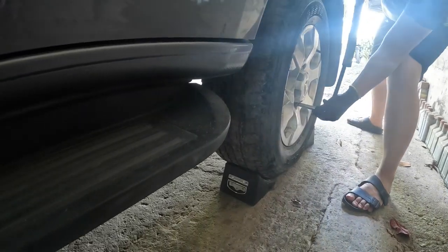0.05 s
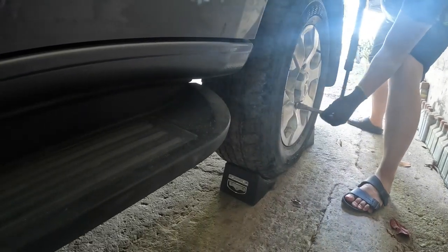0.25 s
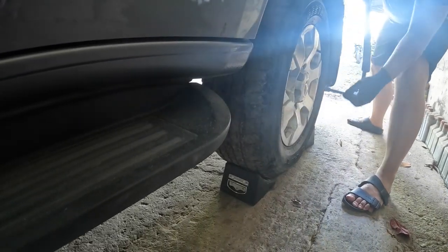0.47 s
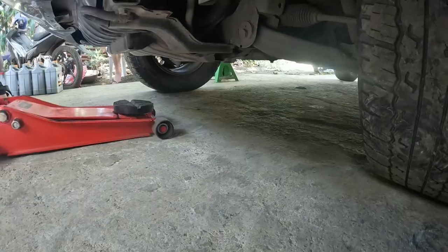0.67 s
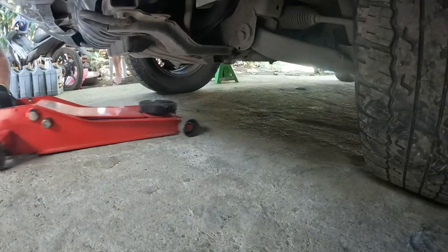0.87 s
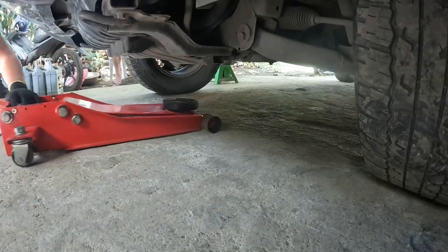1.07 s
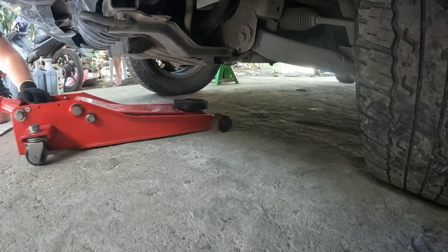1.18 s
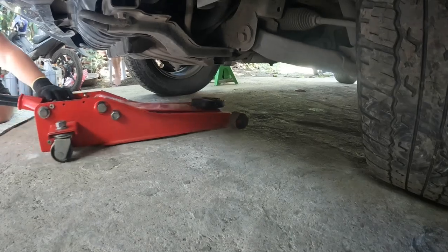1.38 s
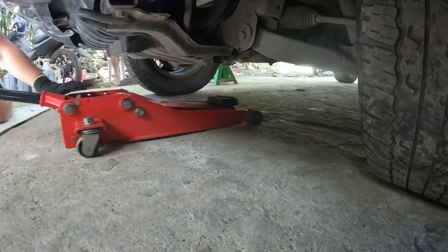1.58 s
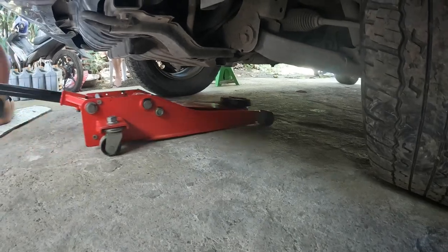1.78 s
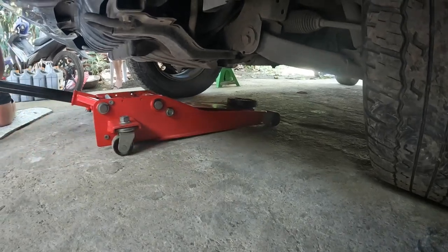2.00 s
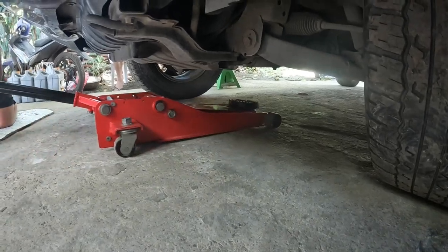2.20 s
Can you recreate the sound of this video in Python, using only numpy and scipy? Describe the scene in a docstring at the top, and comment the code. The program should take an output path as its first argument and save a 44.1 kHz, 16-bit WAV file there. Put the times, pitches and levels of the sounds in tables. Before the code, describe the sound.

A steel floor jack rolls over rough concrete under a car, rumbling and clattering close by while a dry wheel squeals. Just before it, a wrench squeaks and clacks on a tight nut in soft outdoor air.

```python
"""First a wrench squeaks, scrapes and clacks on a tight wheel nut, over soft outdoor air.
After about half a second the scene changes abruptly: a steel floor jack is pushed over rough concrete
under a car. Its wheels grind and rumble, the loose lifting arm and casters knock at every bump,
and a dry wheel squeals as it sticks and slips. A little after two seconds the jack comes to rest."""
import sys
import numpy as np
from scipy import signal
from scipy.fft import rfft, irfft
from scipy.io import wavfile
from scipy.ndimage import uniform_filter1d

SR = 44100
rng = np.random.default_rng(int(sys.argv[2]) if len(sys.argv) > 2 else 0)


def waveform_to_disk(signal):
    """Save audio, clipped to [-1, 1], as 16-bit WAV at the path in sys.argv[1]."""
    frames = np.transpose(np.atleast_2d(signal))
    scaled = np.clip(frames, -1, 1) * 32767
    samples = np.round(scaled).astype(np.int16)
    wavfile.write(sys.argv[1], SR, samples)


N = 99225
T = np.arange(N) / SR

# The notes at which the jack's frame rings. Each row: pitch in Hz, width in Hz, level in dB.
FRAME_MODES = [(400, 5.3, -13), (510, 15, -0.5), (774.5, 46, 0), (1160, 30, 2.5), (1409, 33, 9),
               (1530, 11, -14), (1704, 210, 2), (1940, 28, -7), (2280, 45, -7), (2770, 17, -4),
               (3064, 96, -9), (3580, 40, -7), (4440, 150, -11.5), (5160, 91, -21), (6480, 60, -13),
               (8200, 59, -26), (10370, 45, -18), (10900, 80, -26)]


def from_db(db):
    """Turn decibels into a gain."""
    return 10 ** (np.asarray(db) / 20)


def rms_one(x):
    """Scale a sound to an average level of 1."""
    return x / np.sqrt(np.mean(x ** 2) + 1e-20)


def in_time(rows):
    """Join rows that start with a time by straight lines: one curve for each other column."""
    times, *columns = np.transpose(rows)
    return [np.interp(T, times, column) for column in columns]


def drift(hz):
    """A random wobble of size 1; more Hz makes it quicker."""
    r = np.exp(-2 * np.pi * hz / SR)
    return rms_one(signal.lfilter([1], [1, -2 * r, r * r], rng.standard_normal(2 * N))[N:])


def body(x, colour, modes=()):
    """Give a sound a colour (its balance of low and high) and ringing notes, at level 1."""
    f = np.maximum(np.arange(N // 2 + 1) * SR / N, 1)
    hz, db = np.transpose(colour)
    power = from_db(np.interp(np.log(f), np.log(hz), db)) ** 2
    for centre, width, level in modes:
        power += from_db(level) ** 2 / (1 + ((f - centre) / width) ** 2) ** 2
    return rms_one(irfft(rfft(x) * np.sqrt(power), N))


def noise():
    """A plain, even hiss."""
    return rng.standard_normal(N)


def grains(per_s, spread_db):
    """Tiny random contacts of uneven size."""
    sizes = from_db(spread_db * np.minimum(rng.exponential(1, N), 3))
    return (rng.random(N) < per_s / SR) * sizes * rng.choice([-1, 1], N)


def even(x, span_s):
    """Hold a sound's level steady from moment to moment."""
    power = np.abs(uniform_filter1d(x * x, max(int(span_s * SR), 2)))
    return x / np.sqrt(power + 1e-9)


def split(x, treble_hz=3520):
    """Split a sound into its low and high parts."""
    low = signal.sosfiltfilt(signal.butter(2, treble_hz, fs=SR, output="sos"), x)
    return low, x - low


def blows(times, levels_db, rise_s, t60):
    """The loudness curve of hits that rise fast, then fade by 60 dB in t60 seconds."""
    power = np.zeros(N)
    for s, db in zip(times, levels_db):
        start = int(s * SR)
        age = T[:max(N - start, 0)][:SR // 2]
        fade = from_db(db - 60 * np.maximum(age - rise_s, 0) / t60)
        power[start:start + len(age)] += (np.minimum(age / rise_s, 1) * fade) ** 2
    return np.sqrt(power)


def stick_slip(hz, harmonics_db, bright_db, flutter_db, rough):
    """A rubbing tone: uneven slips blur the higher harmonics, and each harmonic flutters."""
    phase = 2 * np.pi * np.cumsum(hz) / SR + rough * drift(173)
    tone = np.zeros(N)
    for k, db in enumerate(harmonics_db):
        flutter = flutter_db * np.sqrt(k + 1) * drift(61)
        tone += from_db(db + bright_db * min(k, 2) + flutter) * np.sin((k + 1) * phase)
    return tone


def reflections(x, t60, wet_db=-14, dull_hz=6000):
    """Add short, duller echoes from between the floor and the car."""
    age = T[:SR // 2]
    tail = rng.standard_normal(len(age)) * from_db(-60 * age / t60) * (age > .003)
    tail = signal.sosfilt(signal.butter(2, dull_hz, fs=SR, output="sos"), tail)
    return x + from_db(wet_db) * signal.fftconvolve(x, tail / np.sqrt(np.sum(tail ** 2)))[:N]


def outdoor_air(around_wrench):
    """A soft, low rush of air, one for each scene."""
    # The air's colours. Each row: frequency in Hz, level in dB.
    wrench_air = [(15, 8), (40, -5.5), (70, -14.5), (150, -15.5), (300, -27), (800, -31), (2000, -45),
                  (5000, -41), (10000, -48), (16000, -72)]
    jack_air = [(15, 11.5), (40, 0.5), (70, -25), (150, -14.5), (300, -27.5), (800, -17.5), (2000, -29),
                (5000, -33), (10000, -42), (16000, -81)]
    db, colour = (-34.5, wrench_air) if around_wrench else (-35, jack_air)
    return from_db(db) * body(noise(), colour)


def nut_squeak():
    """The tight nut sings as it sticks and slips."""
    # The squeak. Each row: time in seconds, pitch in Hz, level in dB.
    squeak = [(0, 1020, -74), (.05, 1022, -34.5), (.11, 1007, -33), (.15, 1032, -42), (.19, 1030, -47),
              (.245, 992, -42), (.28, 975, -32.5), (.325, 1002, -35), (.335, 991, -52), (.347, 994, -47),
              (.355, 984, -30.5), (.385, 995, -40.5), (.42, 1004, -40), (.48, 989, -38), (.535, 996, -33.5),
              (.56, 990, -33)]
    # Each harmonic's level in dB, lowest first.
    harmonics_db = [-12.5, 0, -19, -33]
    hz, db = in_time(squeak)
    pitch = hz * (1 + 0.0028 * drift(54))
    return from_db(db) * stick_slip(pitch, harmonics_db, bright_db=0, flutter_db=2.2, rough=0.015)


def wrench():
    """The steel wrench rings as it scrapes on the nut and clacks in its socket."""
    # The scraping. Each row: time in seconds, level in dB, extra treble in dB.
    scraping = [(0, -51.5, -5), (.035, -40, -4), (.06, -44.5, -14), (.08, -29, 4), (.12, -38, 2.5),
                (.165, -39.5, 0), (.19, -44, -6), (.222, -30, 3), (.255, -43, 3), (.3, -52, -8),
                (.38, -52, -20), (.41, -28.5, -8), (.44, -27.5, -5), (.46, -31, 6.5), (.478, -31, 5.5),
                (.505, -33.5, 4), (.53, -41, 5), (.56, -46, -3)]
    # The clacks. Each row: start in seconds, level in dB.
    hits = [(0.1986, -21), (0.206, -27), (0.4353, -23.5), (0.474, -36)]
    # The wrench's ringing notes. Each row: pitch in Hz, width in Hz, level in dB.
    modes = [(1200, 250, -11), (1650, 80, 0.5), (1790, 61, 3.5), (2000, 117, 1), (3057, 81, 2),
             (3260, 61, -6), (4740, 65, -2.5), (6570, 33, -6), (7650, 180, -10.5), (8300, 61, -10.5),
             (8690, 69, -11), (9490, 35, -13.5), (10050, 31, -11), (10900, 40, -19), (11200, 45, -19),
             (12900, 30, -26), (13400, 30, -29)]
    # Each row of a colour: frequency in Hz, level in dB.
    scrape_colour = [(100, -31), (550, -16.5), (1400, -6), (2500, -26), (4200, -18.5), (5800, -36),
                     (8000, -30), (13000, -42), (16000, -45)]
    clack_colour = [(100, -19), (600, -22), (1700, -6), (2600, -13), (4200, -17), (5800, -29), (8000, -26),
                    (16000, -41)]
    scrape_db, treble_db = in_time(scraping)
    low, high = split(even(body(grains(1800, spread_db=-1), scrape_colour, modes), span_s=0.033))
    scrape = from_db(scrape_db) * (low + from_db(treble_db) * high)
    ring = even(body(noise(), clack_colour, modes), span_s=0.015)
    return scrape + ring * blows(*np.transpose(hits), rise_s=.001, t60=0.092)


def ticks():
    """One light, bright tick in each scene."""
    # The ticks. Each row: start in seconds, level in dB.
    hits = [(.134, -28.5), (2.122, -37)]
    # Their colour. Each row: frequency in Hz, level in dB.
    colour = [(500, -25), (2500, -6), (3800, 4), (5500, -12), (8000, -5), (12000, -21), (16000, -28)]
    return blows(*np.transpose(hits), rise_s=0.0014, t60=0.083) * body(noise(), colour)


def rolling():
    """Steel wheels grind grit, rumble over the rough floor and make the frame boom."""
    # The rolling. Each row: time in seconds, then grind, rumble and boom levels in dB.
    levels = [(.55, -54, -34.5, -53), (.62, -64, -42.5, -50), (.715, -37, -21, -59),
              (.75, -23.5, -19.5, -39), (.86, -22, -20.5, -27.5), (.915, -27, -36, -30),
              (.97, -19, -15, -29), (1.05, -37, -26, -35.5), (1.13, -30, -20, -30),
              (1.2, -33.5, -26, -28.5), (1.26, -24.5, -25, -28.5), (1.35, -27, -21, -24.5),
              (1.5, -27.5, -21.5, -24), (1.6, -25.5, -24, -21.5), (1.66, -26, -36, -24.5),
              (1.705, -34.5, -34, -25), (1.8, -34, -27, -28), (1.88, -31.5, -30, -30.5),
              (1.97, -42.5, -44, -30), (2.05, -51, -49, -51), (2.09, -42.5, -52, -40.5),
              (2.17, -51, -44, -49.5), (2.25, -46, -49, -48)]
    # Each row of a colour: frequency in Hz, level in dB.
    grind_colour = [(100, -16), (300, -7.5), (600, -6.5), (1000, -3), (1550, -10.5), (2400, -5.5),
                    (4000, -13.5), (5500, -19.5), (7500, -22), (10500, -22), (12500, -41), (16000, -52)]
    rumble_colour = [(15, 9), (28, 8), (42, 1), (58, 12.5), (85, 0), (110, -1.5), (160, -20), (300, -19.5),
                     (1000, -44)]
    boom_colour = [(40, -8), (100, -11), (160, -18.5), (235, -5.5), (320, -12.5), (500, -18), (1500, -45)]
    # The boom's low notes. Each row: pitch in Hz, width in Hz, level in dB.
    boom_modes = [(135, 16, -1.5), (189, 19, 1)]
    grind_db, rumble_db, boom_db = in_time(levels)
    grind = even(body(grains(1100, spread_db=3.5), grind_colour, FRAME_MODES), span_s=.05)
    rumble = even(body(noise(), rumble_colour), span_s=0.0619)
    boom = even(body(noise(), boom_colour, boom_modes), span_s=0.034)
    return from_db(grind_db) * grind + from_db(rumble_db) * rumble + from_db(boom_db) * boom


def frame_ring(hz=1440, width_hz=55):
    """The dry wheel shakes the frame, which rings at its main note."""
    # The ringing. Each row: time in seconds, level in dB.
    levels = [(.6, -70), (.612, -42), (.68, -64), (.72, -52), (.745, -22.5), (.83, -19), (.88, -36),
              (.93, -39), (1.05, -59), (1.12, -41), (1.143, -16), (1.17, -52)]
    db, = in_time(levels)
    ring = even(body(noise(), [(100, -70), (16000, -70)], [(hz, width_hz, 0)]), span_s=0.031)
    return ring * from_db(db) * (T > levels[0][0]) * (T < levels[-1][0])


def knocks():
    """Each bump rattles the loose steel parts and thumps the frame."""
    # The bumps. Each row: start in seconds, level in dB, extra treble in dB, thump strength in dB.
    bumps = [(.607, -41, -13, -49), (0.739, -18.5, -4, -27.5), (0.773, -19, 5, -42), (0.82, -14.5, -2, -33),
             (.844, -17.5, 8, -9), (.866, -18, 10.5, -24), (0.88, -25, 9.5, -8.5), (.941, -16, 3.5, -10.5),
             (0.968, -27.5, 14, -12), (.978, -13, 1, -33), (0.988, -10, 0, -46), (1.086, -18, 2, -12.5),
             (1.133, -21, 6, -15.5), (1.174, -17, -23, -10.5), (1.2222, -15.5, 2.5, -12.5),
             (1.24, -14.5, -5, -19), (1.27, -12, -8.5, -12.5), (1.317, -13.5, 1, -6.5),
             (1.359, -19, 2, -25), (1.396, -9.5, 3.5, -35), (1.4216, -14.5, 0, -14.5),
             (1.442, -12, -10, -20), (1.47, -17.5, 5.5, -25), (1.49, -12.5, 3.5, -24),
             (1.509, -15.5, -4, -15), (1.535, -19.5, 10, -33), (1.544, -14.5, -8, -37),
             (1.561, -16.5, 8.5, -19.5), (1.607, -15, -1.5, -11), (1.637, -12, -5, -20),
             (1.654, -14, -3, -22), (1.715, -15.5, -1, -27), (1.7586, -13.5, -2.5, -23),
             (1.776, -13, -1, -31), (1.795, -15.5, 1.5, -37), (1.834, -20, 1.5, -34),
             (1.867, -20.5, 1, -19.5), (1.896, -23.5, 4, -34), (1.9385, -21, -3, -38),
             (1.982, -32, -10, -28.5), (2.005, -27, -0.5, -48), (2.059, -32, -10, -32),
             (2.195, -35.5, -14, -48), (2.218, -40.5, 5, -66)]
    # Each row of a colour: frequency in Hz, level in dB.
    rattle_colour = [(100, -36), (300, -0.5), (600, -6.5), (1000, -2.5), (1550, -2), (2400, -4.5),
                     (4000, -6.5), (5500, -13), (7500, -23.5), (10500, -26), (12500, -33.5), (16000, -48)]
    thump_colour = [(20, -30), (55, 0), (90, 11), (135, 7), (190, 1.5), (280, -17), (500, -16), (1500, -49)]
    starts, db, treble_db, thump_db = np.transpose(bumps)
    low, high = split(even(body(grains(2500, spread_db=0.5), rattle_colour, FRAME_MODES), span_s=0.014))
    low *= blows(starts, db, rise_s=0.0033, t60=0.097)
    high *= blows(starts, db + treble_db, rise_s=0.0033, t60=0.062)
    thump = even(body(noise(), thump_colour), span_s=0.023)
    thump *= blows(starts, thump_db - 7, rise_s=0.0043, t60=0.12)
    return low + high + thump + pit_drops(starts, thump_db + 3)


def pit_drops(times, levels_db, length_s=.008):
    """A wheel dropping into a pit gives one soft pulse of low pressure."""
    pulses = sum(from_db(db) * np.sin(np.pi * np.clip((T - s) / length_s, 0, 1)) ** 2
                 for s, db in zip(times, levels_db))
    return -signal.sosfilt(signal.butter(1, 35, "high", fs=SR, output="sos"), pulses)


def squeals(jitter=0.01236, fade_s=0.0067):
    """A dry axle sticks and slips at an unsteady pitch."""
    # One list per squeal. Each row: time in seconds, pitch in Hz, strength in dB, brightness in dB.
    curves = [
        [(.685, 1849, -54, -22), (.708, 1814, -23, -56), (.721, 1739, -18, -3.5), (.732, 1727, -28, -3),
         (.765, 1745, -16.5, -0.5), (.783, 1832, -15.5, 1), (.825, 1855, -18.5, 1), (.871, 1917, -15.5, -6),
         (.9, 2030, -41, -3)],
        [(.995, 1900, -42, -5), (1.011, 1909, -14.5, 0.5), (1.035, 1890, -19, 1.5), (1.048, 1818, -21.5, 2),
         (1.063, 1835, -15, 3), (1.081, 1937, -16.5, -0.5), (1.108, 1720, -24.5, 6), (1.13, 1753, -20, -2.5),
         (1.165, 1800, -39, -15)],
        [(1.84, 1765, -30, -5), (1.882, 1755, -20, -17), (1.9, 1802, -24.5, -10), (1.925, 1650, -33, -5)],
    ]
    # Each harmonic's level in dB, lowest first.
    harmonics_db = [-1, -10, -14, -22, -31, -36]
    out = np.zeros(N)
    for rows in curves:
        hz, db, bright_db = in_time(rows)
        fade = np.clip(np.minimum(T - rows[0][0], rows[-1][0] - T) / fade_s, 0, 1)
        pitch = hz * (1 + jitter * drift(126))
        tone = stick_slip(pitch, harmonics_db, bright_db, flutter_db=2.02, rough=0.39)
        out += fade * from_db(db) * tone
    return out * np.sqrt(2)


def rings_and_squeak():
    """Brief pitched rings of loose parts, and one rough, high squeak near 1.67 s."""
    # The short sounds. Each row: start in seconds, pitch in Hz, level in dB.
    bursts = [(0.716, 6000, -28.5), (0.74, 3050, -21.5), (.987, 804, -16.5), (1.2256, 2720, -16),
              (1.27, 2670, -19), (1.317, 286.6, -20), (1.398, 744, -17.5), (1.425, 2400, -24),
              (1.492, 1160, -18), (1.638, 2370, -20), (1.657, 4230, -25), (1.674, 4050, -21.5),
              (1.683, 4150, -31), (1.781, 1540, -32), (1.789, 269, -19.5), (1.796, 1440, -14),
              (1.982, 569, -34.5)]
    out = np.zeros(N)
    for start, hz, db in bursts:
        tone = body(noise(), [(100, -70), (16000, -90)], [(hz, 0.045 * hz, 0)])
        out += blows([start], [db], rise_s=0.0021, t60=0.071) * even(tone, span_s=0.0092)
    return out


def crunches():
    """Grit bursts under a wheel in a spray of sharp ticks."""
    # The bursts. Each row: start in seconds, level in dB.
    bursts = [(0.82, -22), (0.844, -21.5), (.868, -28), (1.316, -28), (1.394, -24), (1.438, -27),
              (1.49, -24.5), (1.563, -30), (1.761, -29), (1.78, -37)]
    # Their colour. Each row: frequency in Hz, level in dB.
    colour = [(2000, -20), (5000, 6), (7000, 4), (10000, -8), (13000, -10), (16000, -25)]
    spray = even(body(grains(1800, spread_db=1.5), colour), span_s=0.013)
    return spray * blows(*np.transpose(bursts), rise_s=0.0022, t60=0.13)


def scene(change_s=.553, fade_s=0.0027):
    """First the wrench, then the jack; left and right sound alike."""
    nut = reflections(nut_squeak() + wrench(), t60=0.14) + outdoor_air(around_wrench=True)
    jack = knocks() + rings_and_squeak() + crunches() + rolling() + squeals() + frame_ring()
    jack = reflections(jack, t60=.17) + outdoor_air(around_wrench=False)
    nut_share = np.clip((change_s - T) / fade_s, 0, 1)
    mix = nut_share * nut + (1 - nut_share) * jack + ticks()
    return np.array([mix, mix])


def record(dry, cutoff_hz=15900):
    """Round off the loudest peaks and cut the highest treble."""
    rounded = 1.2 * np.tanh(dry / 1.2)
    return signal.sosfilt(signal.ellip(10, .3, 75, cutoff_hz, fs=SR, output="sos"), rounded)


dry = scene()
out = record(dry)
waveform_to_disk(out)
```